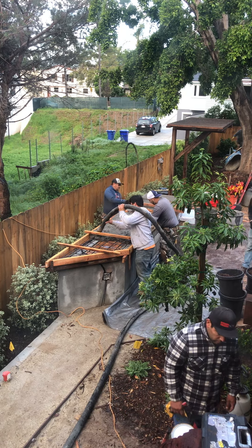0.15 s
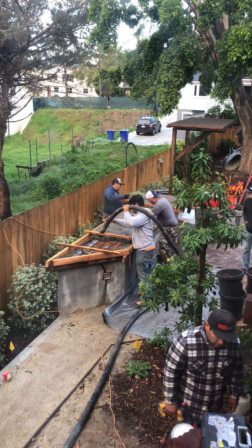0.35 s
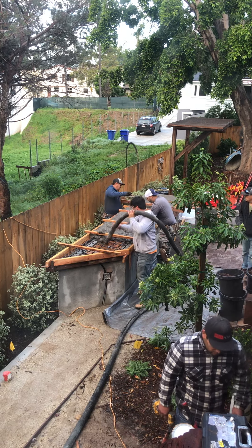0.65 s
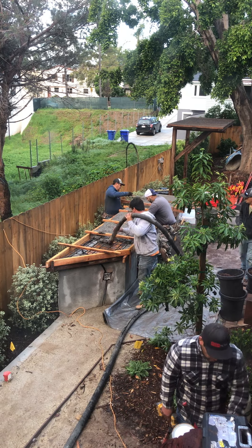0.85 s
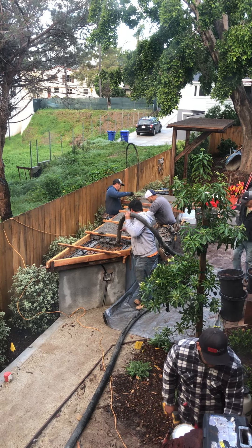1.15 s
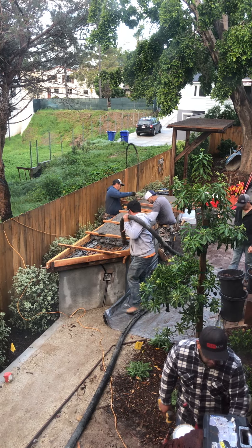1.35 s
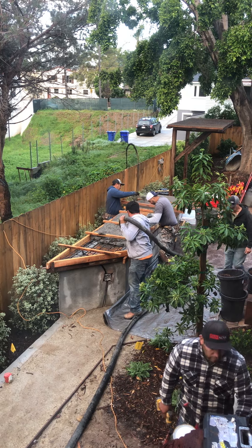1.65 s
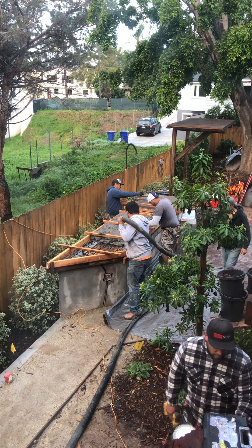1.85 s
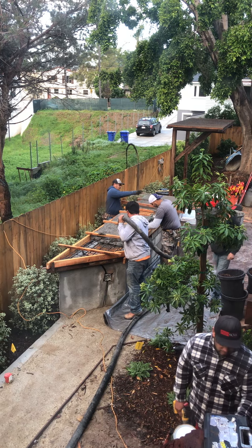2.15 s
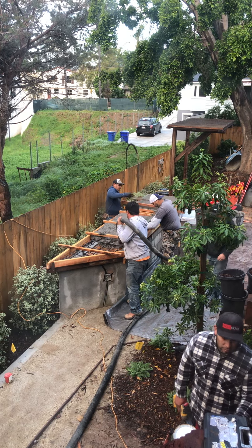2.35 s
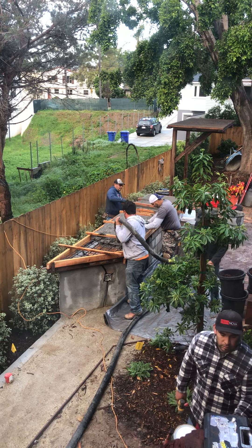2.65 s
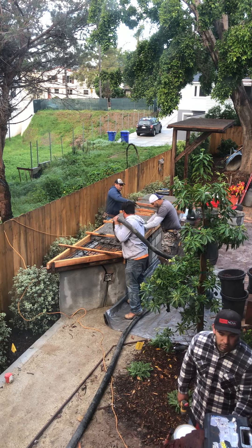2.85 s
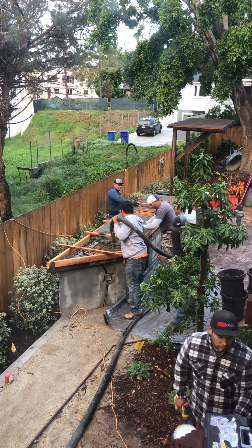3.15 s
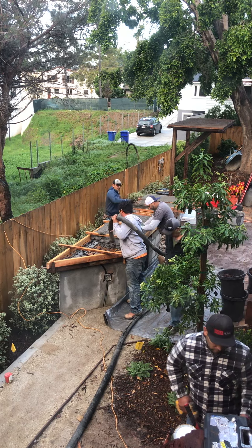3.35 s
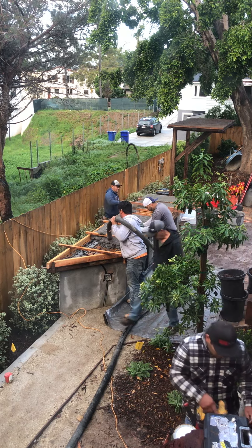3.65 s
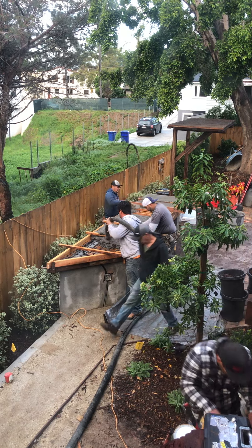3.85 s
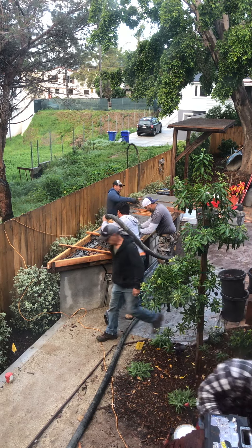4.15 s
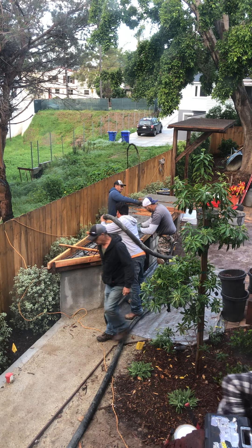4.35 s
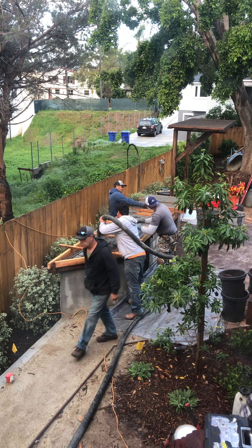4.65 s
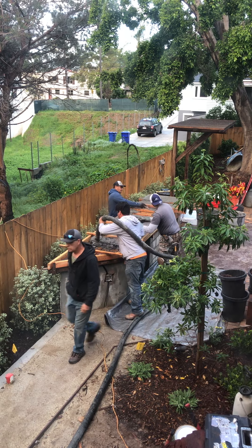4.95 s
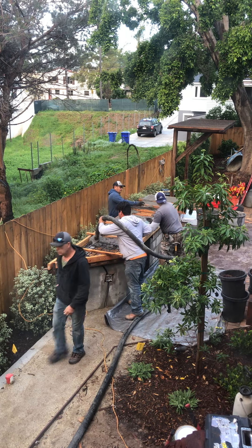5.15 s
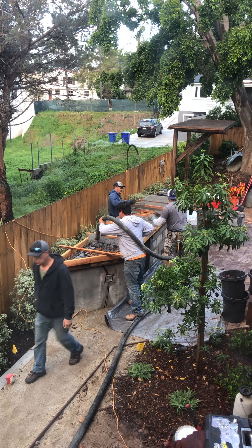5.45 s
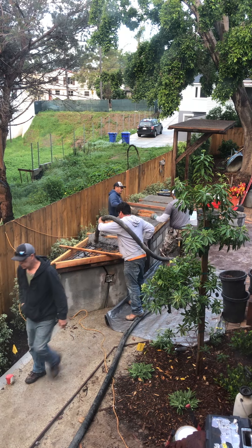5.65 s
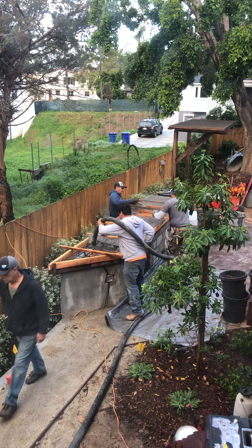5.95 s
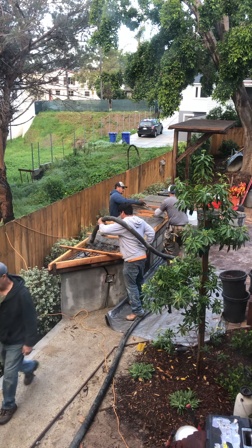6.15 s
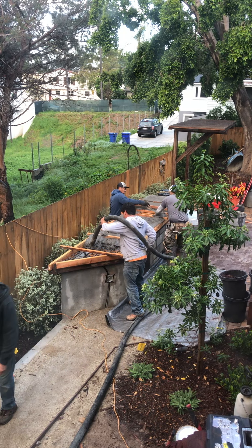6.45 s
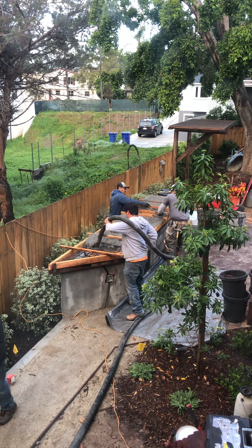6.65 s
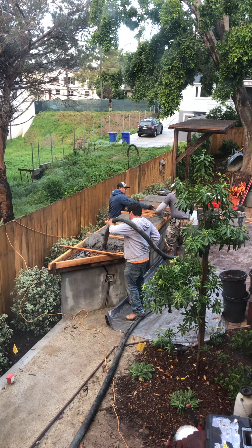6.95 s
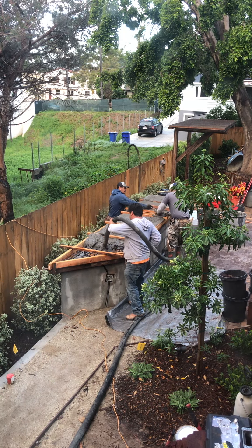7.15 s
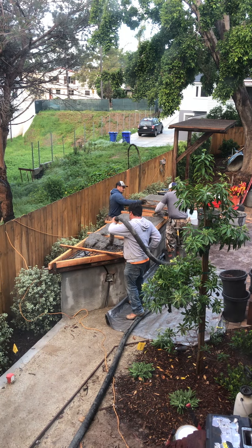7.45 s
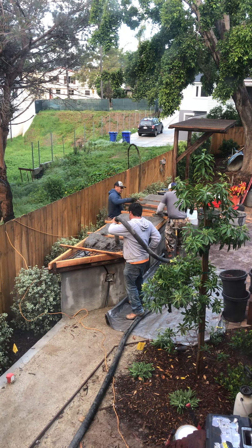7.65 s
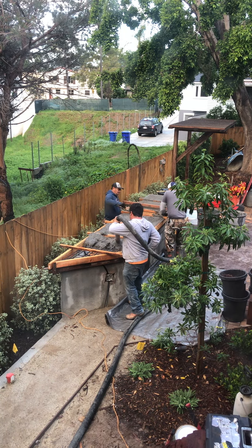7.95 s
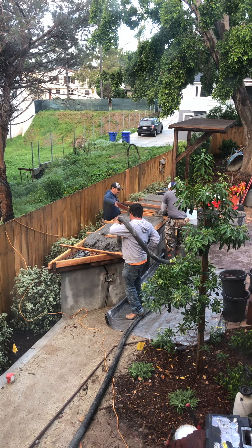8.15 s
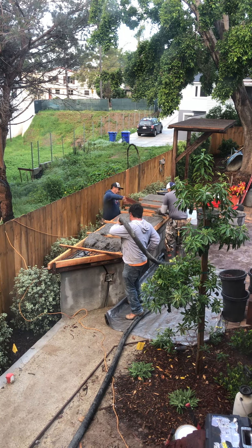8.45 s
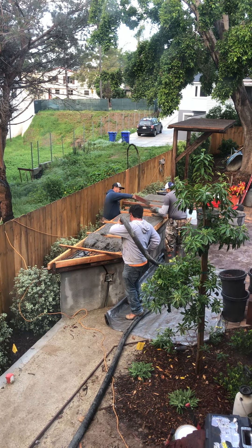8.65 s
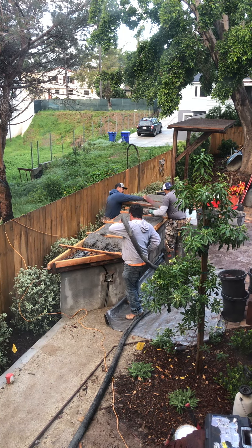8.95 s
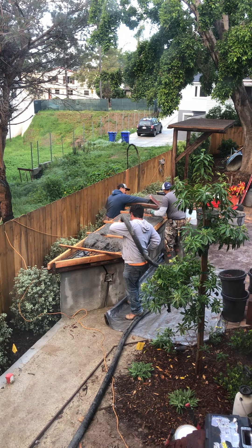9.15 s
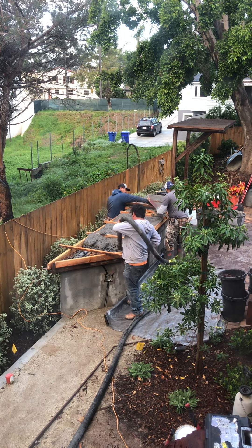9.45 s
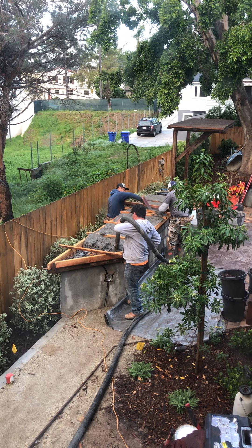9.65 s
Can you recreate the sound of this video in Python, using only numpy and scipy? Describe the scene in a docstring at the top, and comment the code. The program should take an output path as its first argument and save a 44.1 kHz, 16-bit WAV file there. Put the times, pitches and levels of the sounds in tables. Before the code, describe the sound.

A heavy engine runs throughout, low and throbbing, pushing concrete through a hose. Its exhaust swells in regular strokes, pitch lifting a little then being dragged back, as airy hiss and midrange rattle drop and build again. Beneath is another machine's slow beating hum; above, faint wavering whines. Sparse tool ticks and scuffs, one high squeak, and a late ringing tap sit just over the drone. Single stationary outdoor microphone.

```python
"""Beyond a garden a concrete pump drones: sinusoids at multiples of its engine cycle over coloured noise.
Every 1.6 s or so its stroke turns over: the engine surges, the exhaust swells and the clatter and hiss
sink, then build again. Thin whines waver, and a second, slower hum beats against the exhaust.
Nearer by, workers' tools tick, scrape and squeak on the wet concrete and the formwork: ringing taps,
swelling bands of noise and shaky tones."""
import sys
import numpy as np
from scipy import signal
from scipy.fft import rfft, irfft, next_fast_len
from scipy.io import wavfile
from scipy.ndimage import map_coordinates

SR = 44100
rng = np.random.default_rng(int(sys.argv[2]) if len(sys.argv) > 2 else 0)


def master(y):
    """Save y as 16-bit WAV."""
    cut = np.clip(np.atleast_2d(y).T, -1, 1)
    pcm = np.round(cut * 32767)  # scale
    wavfile.write(sys.argv[1], SR, pcm.astype(np.int16))


N = 432621

# the valve swings over to the other piston: start_s, piston (0 or 1)
STROKES = [(.55, 0), (2.119, 1), (3.741, 0), (5.329, 1), (6.93, 0), (8.509, 1)]
FIRST_BEAT_S = .139  # hum and exhaust first swell together


def amp(db):
    """Decibels to gain."""
    return np.exp(np.asarray(db) * (np.log(10) / 20))


def unit(x):
    """Scale to rms 1."""
    return x / np.sqrt(np.mean(x ** 2) + 1e-20)


def clock():
    """The time of every sample, in seconds."""
    return np.arange(N) / SR


def curve(rows):
    """Join (time_s, value) points by straight lines, one value per sample."""
    time_s, value = np.transpose(rows)
    return np.interp(clock(), time_s, value)


def wobble(rate):
    """A smooth random curve, rate knots a second."""
    coarse = np.arange(0, N + 64, 64)  # worked out every 64 samples
    knots = rng.standard_normal(2048)
    smooth = map_coordinates(knots, [coarse * rate / SR], mode="wrap")
    return np.interp(np.arange(N), coarse, smooth)


def filtered(x, response):
    """Multiply the spectrum of x by a response of frequency."""
    size = next_fast_len(len(x) + SR // 4)
    hz = np.fft.rfftfreq(size, 1 / SR)
    return irfft(rfft(x, size) * response(hz), size)[:len(x)]


def noise(spectrum):
    """Noise of rms 1 coloured by (pitch_hz, level_db) points."""
    points_hz, points_db = np.transpose(spectrum)

    def colour(hz):
        return amp(np.interp(np.log(hz + 1), np.log(points_hz), points_db))
    return unit(filtered(rng.standard_normal(N), colour))


def resonant_noise(centre_hz, width_hz):
    """Half a second of noise of rms 1 in one resonance."""
    def resonance(hz):
        return 1 / (1 + ((hz - centre_hz) / width_hz * 2) ** 2)
    return unit(filtered(rng.standard_normal(SR // 2), resonance))


def tone(turns):
    """A sinusoid of rms 1 from its count of cycles."""
    return np.sqrt(2) * np.cos(np.float32(2 * np.pi * (turns - np.floor(turns))))


def add(out, start_s, sound):
    """Mix a sound in at its start time."""
    start = max(round(start_s * SR), 0)
    out[start:start + len(sound)] += sound[:N - start]


def cycles(hz):
    """Cycles turned since the first beat."""
    turns = np.cumsum(hz) / SR
    return turns - turns[round(FIRST_BEAT_S * SR)]


def changeovers(delay_s, attack_s, hold_s, release_s):
    """0 under load, near 1 at a changeover: smooth attack, hold, exponential release (one, or one per piston)."""
    out, t = np.zeros(N), clock()
    for start_s, piston in STROKES:
        age = t - start_s - delay_s
        rise = (1 - np.cos(np.pi * np.clip(age / attack_s, 0, 1))) / 2
        piston_release_s = np.broadcast_to(release_s, 2)[piston]
        fall = np.exp(-np.maximum(age - attack_s - hold_s, 0) / piston_release_s)
        out = np.maximum(out, rise * fall)
    return out


def engine_speed(loaded_hz, surge_hz):
    """Firing rate: freed of its load the engine speeds up, then the next piston pulls it down again."""
    return loaded_hz + surge_hz * changeovers(0, attack_s=.2, hold_s=.127, release_s=(.415, .23))


def exhaust(firing_hz, loaded_db, swell_db, rough_db, thinning_db, jitter, shaft_jitter):
    """The firing tone, and the orders that unequal cylinders add; a surge shifts their balance."""
    # four firings make one engine cycle, and the two pistons ring its multiples differently:
    # multiple of the cycle rate (rounded in use), loaded_db, piston_0_surge_db, piston_1_surge_db,
    # lag_s behind the surge
    engine_orders = [(2.01, -81, -72, -72, .01), (3.026, -61, -57, -55, 0.059), (6, -68.5, -68, -66, .05),
                     (7, -55.5, -60, -59, 0.23), (8, -55, -49, -49, 0.016), (9, -66, -72, -74, .02),
                     (11, -73.5, -64, -65.5, .06), (12, -73.5, -74, -72, .05), (14, -66, -61, -59.5, 0.18),
                     (15, -74, -71.5, -81, .05), (16, -80, -74, -71, .03), (17, -76.5, -63.5, -65, 0.17),
                     (18, -68, -62.5, -56.5, 0.11), (20, -65.5, -84, -83, 0.067),
                     (22, -75, -83, -84, 0.088), (28, -87, -76.5, -76, 0.045), (32, -67, -73.5, -73.5, .04),
                     (36, -78.5, -66, -69, 0.095), (41, -71.5, -88, -87, .04), (44, -80, -93, -93, .04),
                     (55.1, -76.5, -86, -87, .04), (57, -78.5, -88, -84, .04), (107.9, -80, -78, -80, .04)]
    linger_order = 15.4  # orders above this swell broadly, those below only at the height of a surge
    t = clock()
    firings = cycles(firing_hz) + shaft_jitter * wobble(12)

    # the swell dies more slowly for piston 0 than for piston 1
    release_s = .17 * np.array((1.57, .71))
    surge = changeovers(delay_s=.02, attack_s=.26, hold_s=.08, release_s=release_s)
    starts_s, pistons = np.transpose(STROKES)
    piston = pistons[np.searchsorted(starts_s, t) - 1]

    # the overtones thin out for a moment as the shaft gathers speed
    speeding_up = np.maximum(np.gradient(firing_hz), 0)
    thinning = thinning_db * (speeding_up / speeding_up.max()) ** 2

    out = amp(loaded_db + swell_db * surge + .34 * wobble(20)) * tone(firings)
    for multiple, calm_db, first_db, second_db, lag_s in engine_orders:
        order = round(multiple)
        swell = np.interp(t - lag_s, t, surge) ** max(linger_order / order, .5)
        surge_db = np.where(piston, second_db, first_db)
        level_db = calm_db + swell * (surge_db - calm_db) - thinning + rough_db * wobble(12)
        out += amp(level_db) * tone(order * firings / 4 + rng.random() + jitter * wobble(10))
    return out


def casing_rumble(level_db):
    """The casing rumbles: low noise of slightly unsteady level."""
    # colour of the rumble: pitch_hz, level_db (relative, per Hz)
    rumble_colour = [(20, -31), (30, -28), (42, -14), (60, -12), (105, -1), (155, -3), (185, -9),
                     (270, -12.5), (400, -15.5), (600, -27.5), (1200, -62)]
    return amp(level_db + 1.6 * wobble(12)) * noise(rumble_colour)


def engine_clatter(firing_hz, loaded_db, dip_db, throb):
    """Mid-range noise that pulses with the engine cycle and sinks at a changeover."""
    # colour of the clatter: pitch_hz, level_db (relative, per Hz)
    clatter_colour = [(250, -25), (450, -6), (560, -4), (780, 1.5), (1030, -3.5), (1250, -7), (1600, -6.5),
                      (1880, -12.5), (2080, -8.5), (2700, -10), (5000, -32)]
    firings = cycles(firing_hz)
    # once a cycle, twice a cycle and at every firing
    pulsing = 1 + throb * (tone(firings / 4) + tone(firings / 2) + tone(firings)) / 2
    dip = changeovers(delay_s=.11, attack_s=.12, hold_s=.28, release_s=.38)
    return amp(loaded_db - dip_db * dip + .56 * wobble(25)) * pulsing * noise(clatter_colour)


def pumping_hiss(loaded_db, dip_db, fade_db_per_s):
    """The high noise of each push sinks at a changeover, builds again, and slowly weakens overall."""
    # colour of the hiss: pitch_hz, level_db (relative, per Hz)
    hiss_colour = [(900, -6), (1900, -4), (2300, 2), (2800, 4.5), (3150, 1), (4000, 2), (6400, 0),
                   (7300, -4), (8500, -6.5), (9300, -12), (12000, -19.5), (15800, -25)]
    dip = changeovers(delay_s=.16, attack_s=.18, hold_s=.062, release_s=.38)
    level_db = loaded_db - fade_db_per_s * clock() - dip_db * dip
    return amp(level_db + .61 * wobble(25)) * noise(hiss_colour)


def whines(waver_db, drift):
    """Faint thin whines of the machinery, and a very faint one at the squeak's pitch: wavering sinusoids."""
    # pitch_hz, level_db
    whine_tones = [(1577, -87.5), (1830, -92), (2374, -82.5), (4392, -91)]
    out = np.zeros(N)
    for pitch_hz, level_db in whine_tones:
        level = amp(level_db + waver_db * wobble(2.4))
        out += level * tone(pitch_hz * clock() + drift * wobble(14))
    return out


def second_machine(hum_db, waver_db):
    """A slower shaft: its hum beats with the exhaust, and the note of its fan follows its speed."""
    # the machine's speed wanders: time_s, hum_hz
    hum_speed = [(0, 70.2), (2.1, 69.51), (3.5, 69.99), (4.9, 68.74), (5.6, 69.77), (6.3, 70.21),
                 (7, 68.72), (7.7, 70.39), (9.1, 71.51), (9.8, 70.11)]
    # level of the fan note: time_s, level_db
    fan_level = [(0, -70), (.9, -61.5), (8.3, -62.5), (8.8, -71)]
    turns = cycles(curve(hum_speed))
    fan = tone(3.457 * turns + .03 * wobble(8))  # ratio of fan note to hum
    return amp(hum_db) * tone(turns) + amp(curve(fan_level) + waver_db * wobble(5)) * fan


def taps():
    """Tools and pebbles tap: each ring starts at once and dies exponentially."""
    # start_s, level_db, ring_hz, width_hz, t60_s (time to fall 60 dB)
    tap_rows = [(0.112, -44.5, 1523, 279, 0.027), (.143, -58, 2720, 200, .04), (.148, -62, 3870, 300, .05),
                (.269, -58, 5170, 2500, 0.056), (.353, -59, 8000, 4000, .015),
                (.412, -59, 13500, 4000, .015), (.79, -57, 2720, 200, 0.054), (.818, -57, 3750, 250, .04),
                (8.359, -49.5, 2090, 70, 0.04), (9.345, -72, 14000, 3000, .04)]
    out, t = np.zeros(N), np.arange(SR // 2) / SR
    for start_s, level_db, ring_hz, width_hz, t60_s in tap_rows:
        # the phase of a narrow noise gives a ring of unsteady pitch
        turns = np.angle(signal.hilbert(resonant_noise(ring_hz, width_hz))) / (2 * np.pi)
        onset = 1 - np.exp(-t * ring_hz * 2)
        add(out, start_s, amp(level_db - 60 * t / t60_s) * onset * tone(turns))
    return out


def scrapes():
    """Hose, boots and wet concrete scuff: bands of noise that swell and fade."""
    # middle_s, level_db, centre_hz, width_hz, half_length_s
    scrape_rows = [(.272, -75, 13000, 6000, .012), (.435, -66, 3900, 300, .025),
                   (0.449, -63, 2590, 350, 0.038), (1.133, -61.5, 2720, 500, 0.037),
                   (1.59, -78, 10000, 8000, .04), (1.59, -56, 200, 200, 0.067),
                   (2.39, -55.5, 940, 800, 0.022), (2.392, -59, 2600, 3000, 0.023),
                   (3.194, -62, 2670, 300, 0.02), (4.678, -67.5, 2650, 600, 0.17),
                   (6.41, -65, 2780, 1000, .07), (9.255, -51, 105, 40, 0.039),
                   (9.663, -66, 2700, 350, 0.071)]
    out, t = np.zeros(N), np.arange(SR // 2) / SR
    for middle_s, level_db, centre_hz, width_hz, half_length_s in scrape_rows:
        swell = np.exp(-((t - t.mean()) / half_length_s) ** 2)
        add(out, middle_s - t.mean(), amp(level_db) * swell * resonant_noise(centre_hz, width_hz))
    return out


def squeak():
    """A steel tool squeaks: tones around fixed pitches, shaken by an uneven grip."""
    # start_s, length_s, pitch_hz, level_db
    squeak_rows = [(3.027, 0.068, 4410, -66), (3.034, 0.043, 4570, -63), (3.035, .05, 11580, -85),
                   (3.082, 0.074, 4392, -70), (3.13, 0.098, 4392, -66)]
    out, t = np.zeros(N), np.arange(SR // 2) / SR
    for start_s, length_s, pitch_hz, level_db in squeak_rows:
        contact = np.clip(t / .003, 0, 1) * np.clip((length_s - t) / .022, 0, 1)
        grip = wobble(72)[:len(t)]  # shakes level and phase together
        add(out, start_s, amp(level_db + 2.1 * grip) * contact * tone(pitch_hz * t + .059 * grip))
    return out


def scene():
    """The pump, its neighbour and the workers, with the faint whines, heard from one spot."""
    firing_hz = engine_speed(loaded_hz=74.51, surge_hz=2.64)
    # jitter, shaft_jitter and drift are in cycles
    pump = exhaust(firing_hz, loaded_db=-40.5, swell_db=6, rough_db=1.15, thinning_db=2.5,
                   jitter=.014, shaft_jitter=.004)
    pump += casing_rumble(level_db=-55.5)
    pump += engine_clatter(firing_hz, loaded_db=-60, dip_db=3.5, throb=.075)
    pump += pumping_hiss(loaded_db=-62, dip_db=4.5, fade_db_per_s=.13)
    thin_whines = whines(waver_db=5.5, drift=.32)
    neighbour = second_machine(hum_db=-49.5, waver_db=1)
    workers = taps() + scrapes() + squeak()
    return (pump + thin_whines + neighbour + workers)[None]


def record(dry):
    """The recorder keeps nothing above its band limit."""
    top_hz = 15800
    return np.array([filtered(channel, lambda hz: hz < top_hz) for channel in dry])


dry = scene()
out = record(dry)
master(out)
```